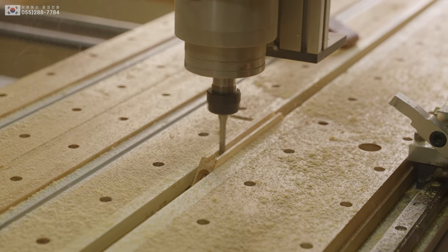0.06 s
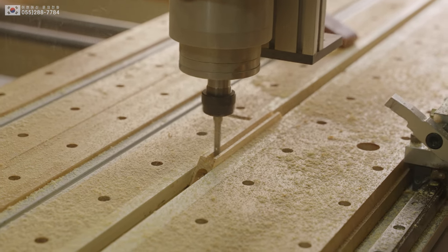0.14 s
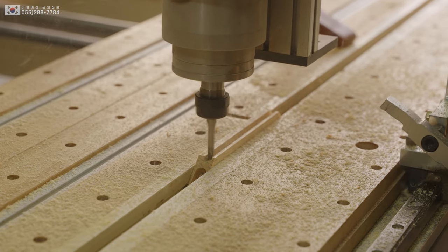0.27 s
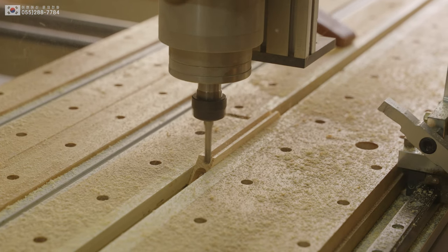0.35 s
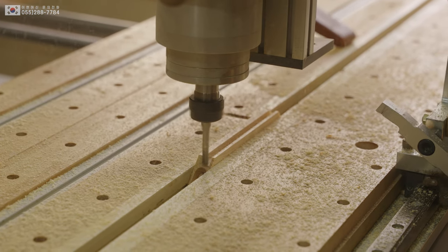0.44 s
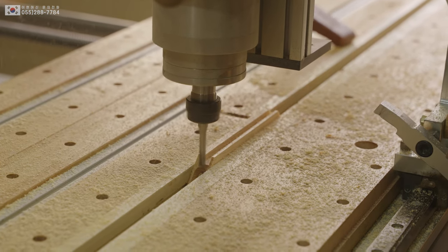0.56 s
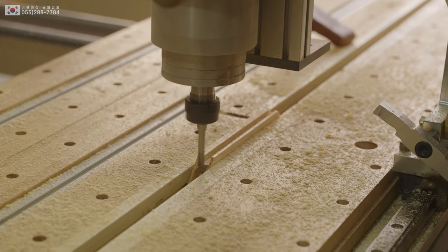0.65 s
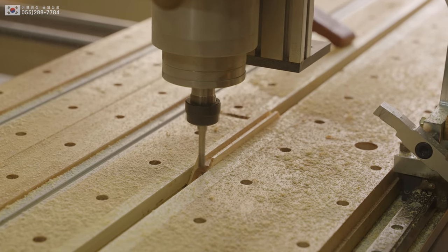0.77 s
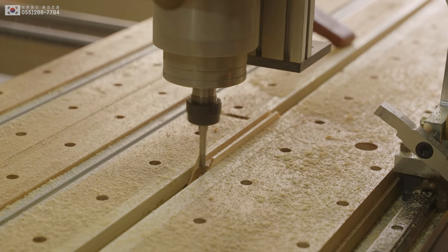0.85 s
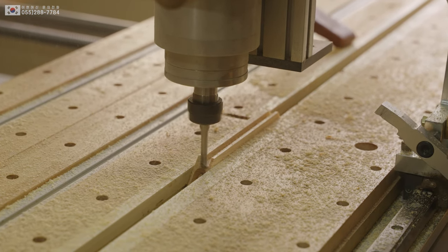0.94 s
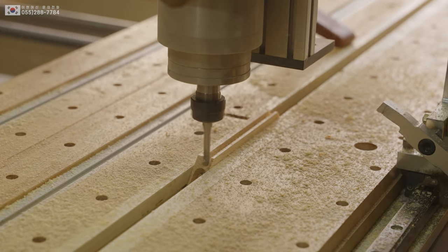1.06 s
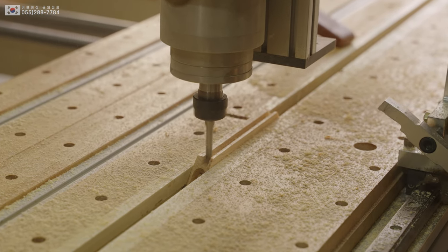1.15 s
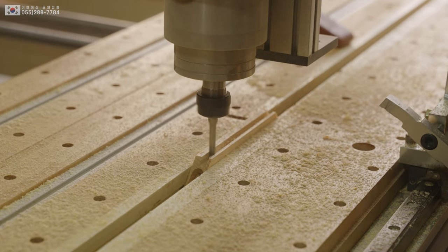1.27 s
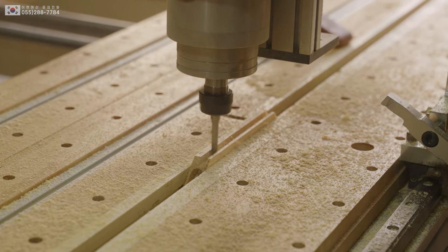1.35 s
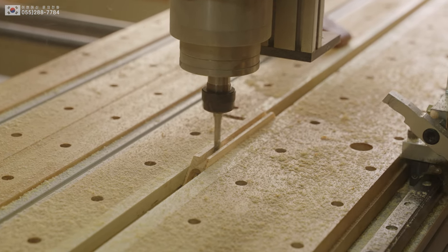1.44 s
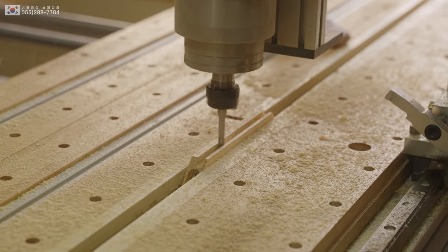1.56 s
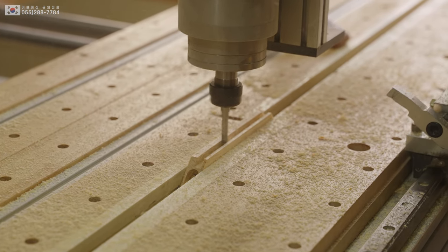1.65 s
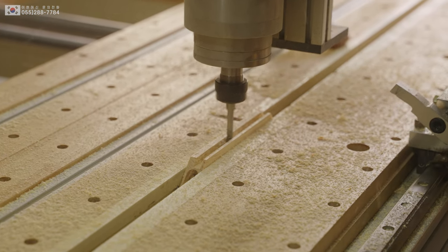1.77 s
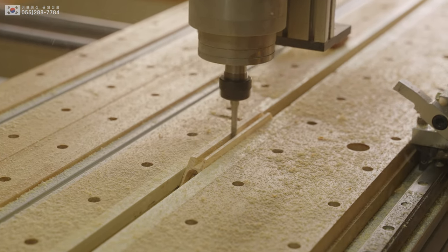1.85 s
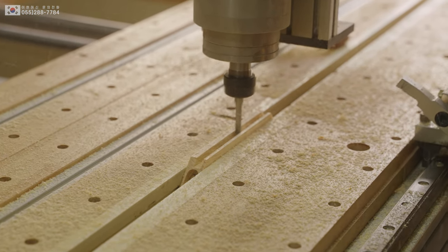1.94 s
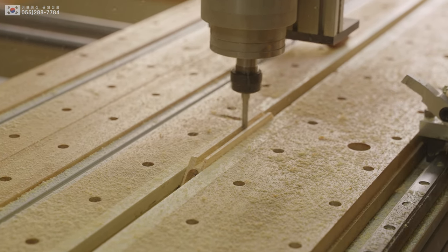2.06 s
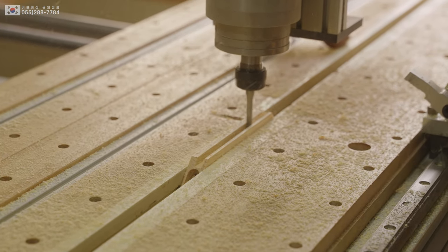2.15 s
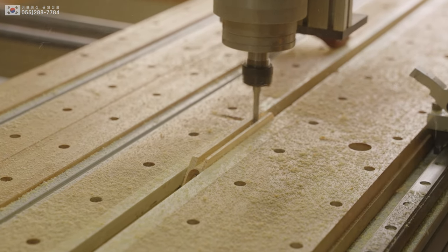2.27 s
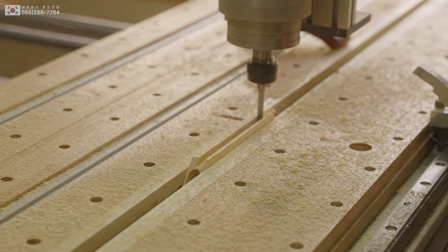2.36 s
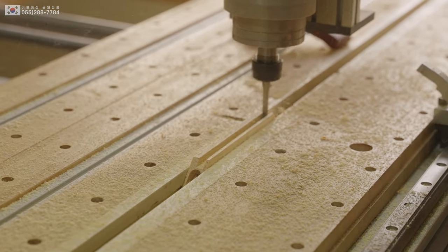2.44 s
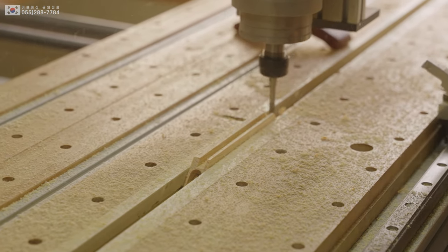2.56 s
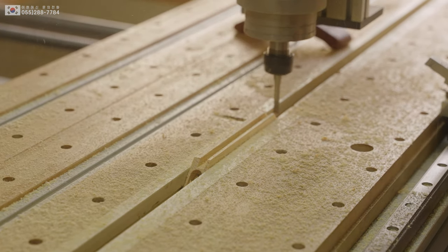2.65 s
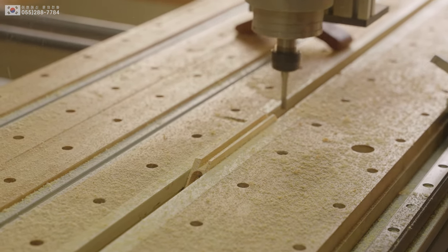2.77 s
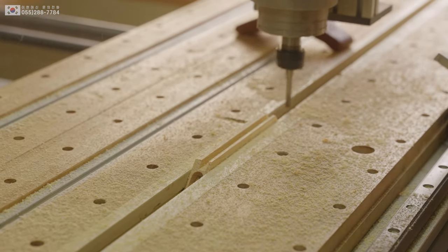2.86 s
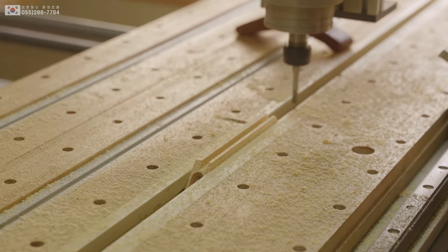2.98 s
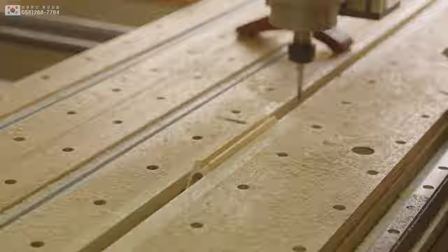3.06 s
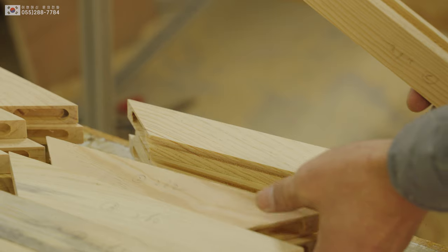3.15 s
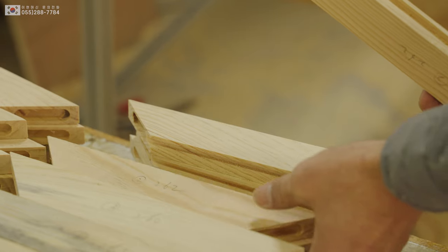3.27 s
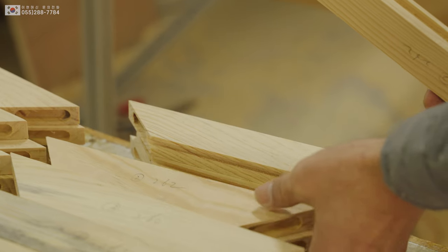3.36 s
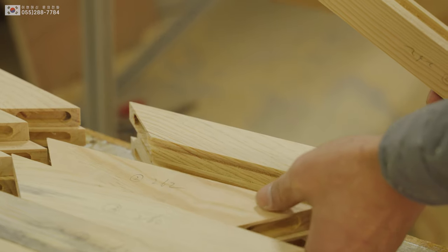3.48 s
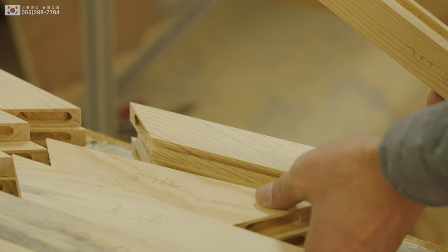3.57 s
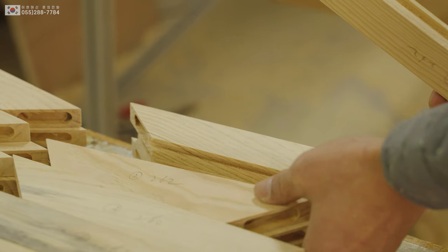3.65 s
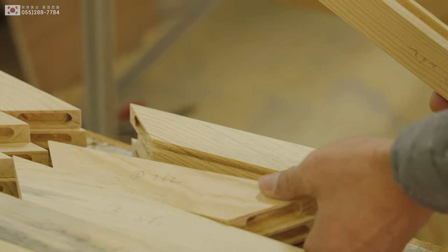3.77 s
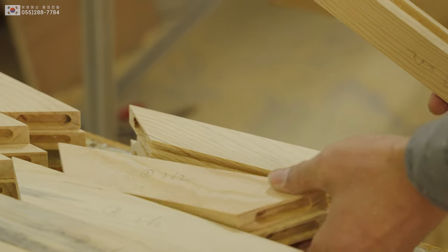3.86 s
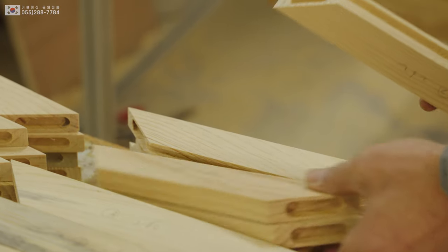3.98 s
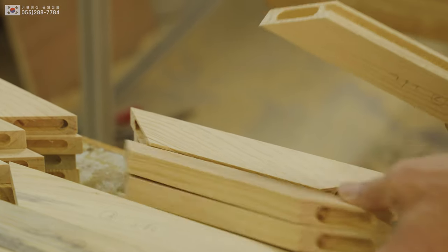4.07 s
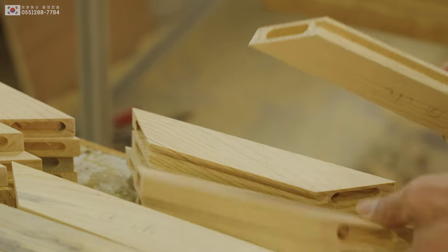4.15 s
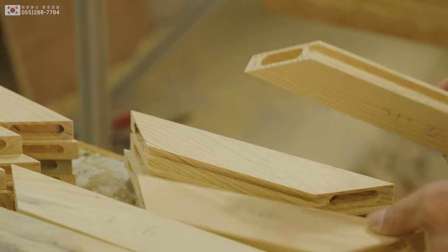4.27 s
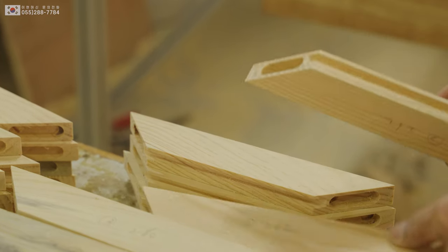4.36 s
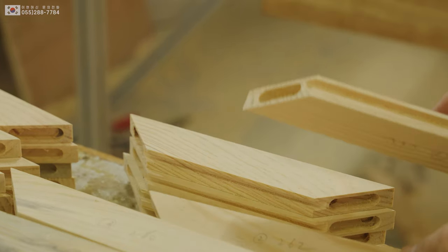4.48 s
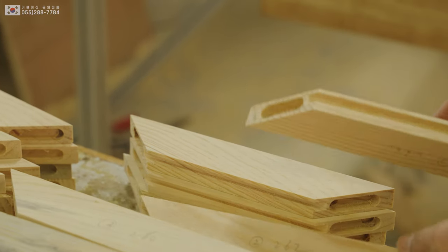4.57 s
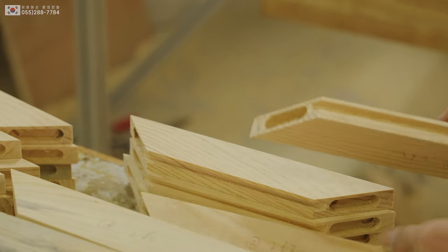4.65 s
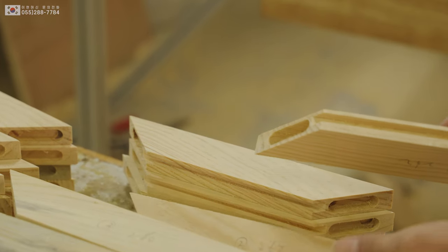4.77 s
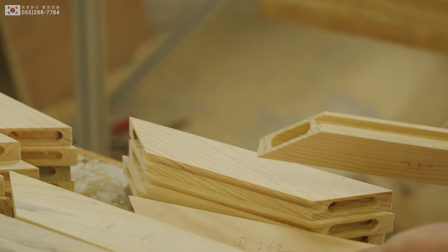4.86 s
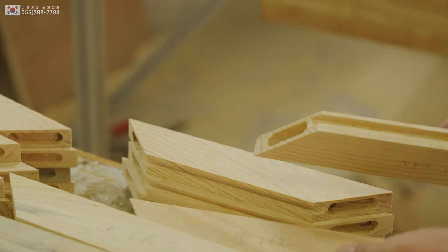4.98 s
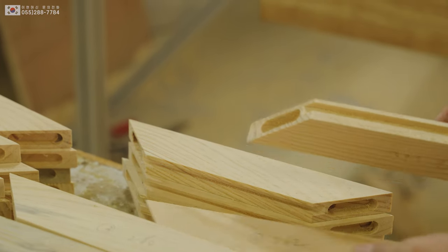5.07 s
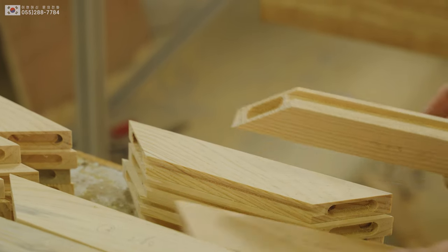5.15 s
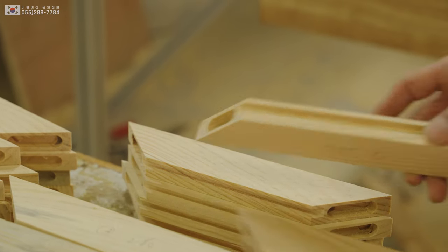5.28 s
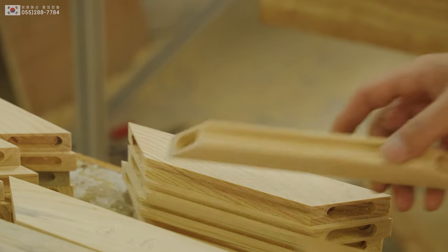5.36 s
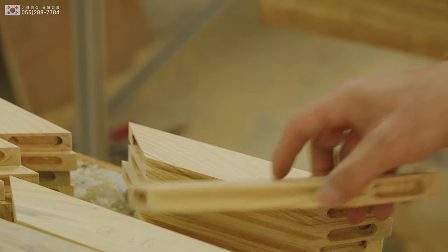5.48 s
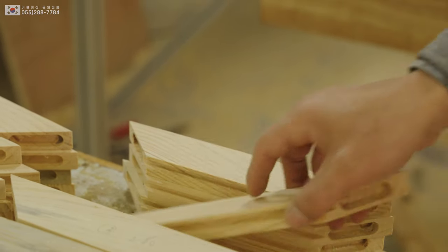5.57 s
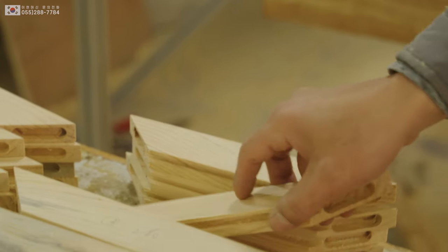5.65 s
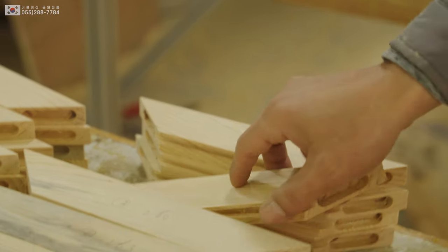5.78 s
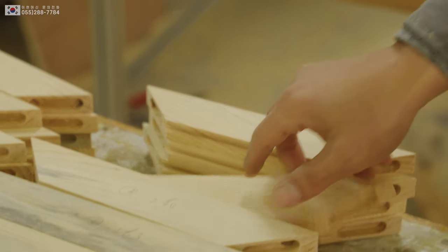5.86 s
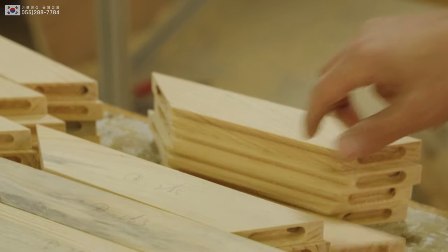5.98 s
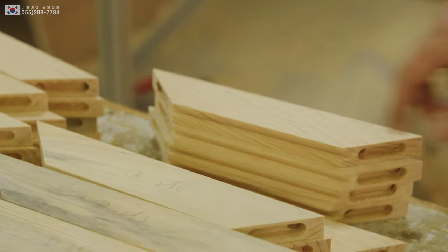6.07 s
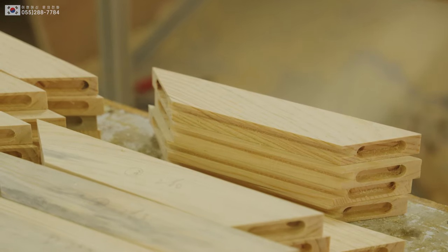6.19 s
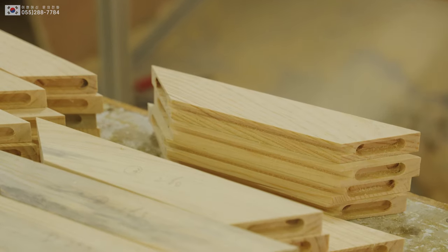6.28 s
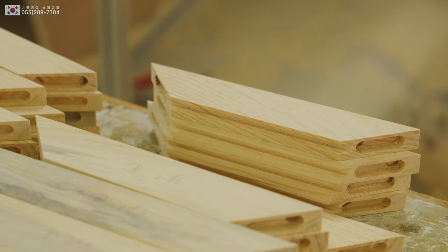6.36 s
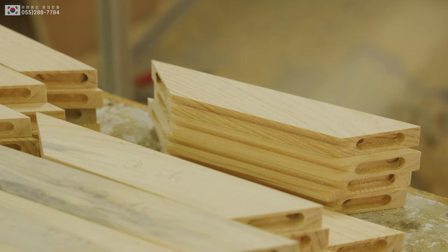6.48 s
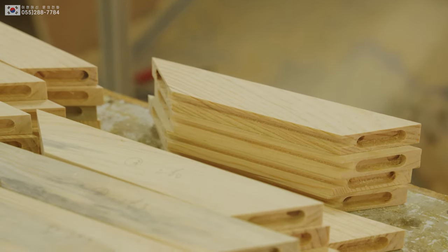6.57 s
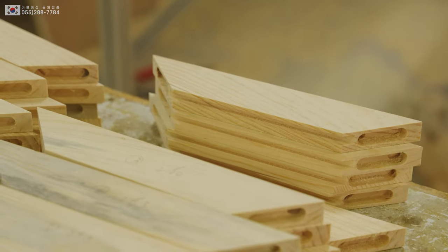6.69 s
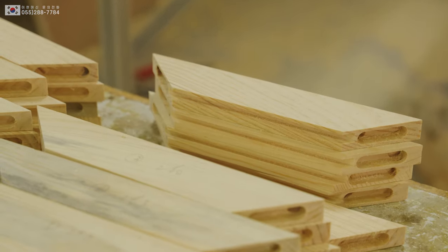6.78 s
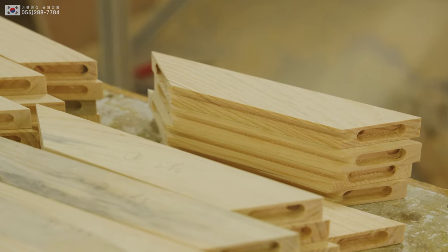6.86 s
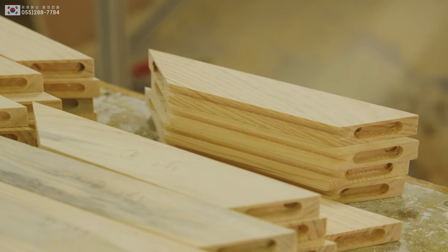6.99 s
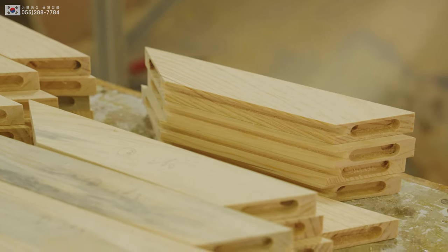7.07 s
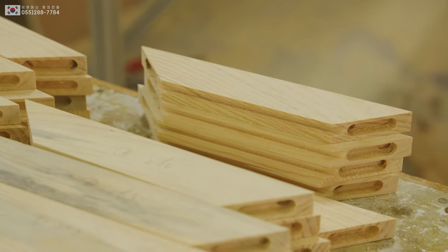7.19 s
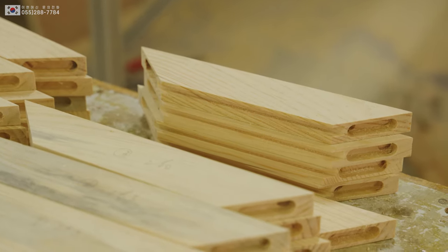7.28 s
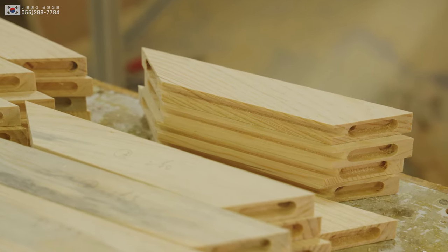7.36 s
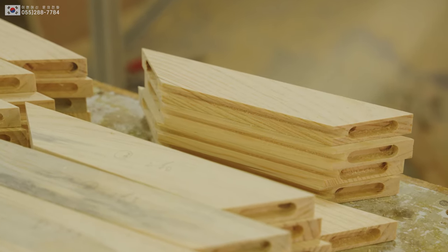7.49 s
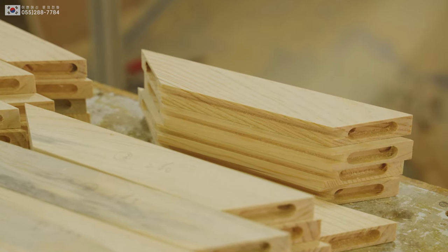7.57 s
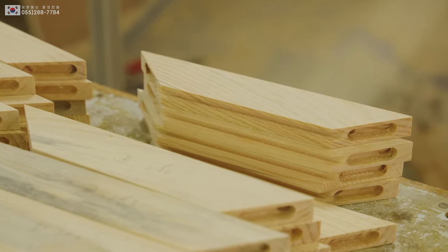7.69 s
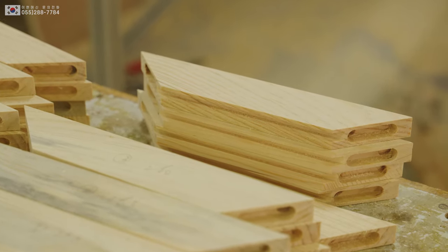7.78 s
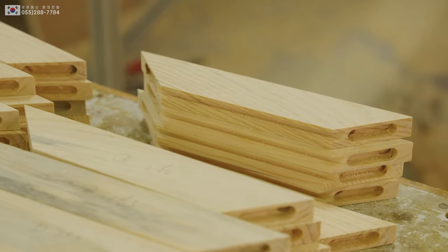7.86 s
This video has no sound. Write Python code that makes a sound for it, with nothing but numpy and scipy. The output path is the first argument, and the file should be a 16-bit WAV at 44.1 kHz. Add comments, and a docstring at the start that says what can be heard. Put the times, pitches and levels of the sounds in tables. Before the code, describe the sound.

In a furniture workshop full of rushing extraction air and humming machines, a nearby router bites into wood briefly, eases off, then cuts for longer with a ringing whine and spraying chips. The sound then shifts to a workbench, where another machine whirs and sings under a high motor whistle. Close in front, wooden rails are set down with a few dull thuds and a quick cluster of sharper knocks, while the machinery keeps running.

```python
"""A close CNC router whines and sprays chips as it cuts a groove in two passes, then runs free.
Its bit strikes the wood every turn and sets the tool ringing. At 3.17 s the scene moves to a bench
in the same furniture workshop, where wooden rails knock as they are stacked. Behind both scenes
dust extraction rushes, shafts hum, a fast motor whistles and a second spindle sings under load."""
import sys
import numpy as np
from scipy import signal
from scipy.fft import rfft, irfft, next_fast_len
from scipy.io import wavfile
from scipy.ndimage import uniform_filter1d, map_coordinates

SR = 44100
rng = np.random.default_rng(int(sys.argv[2]) if len(sys.argv) > 2 else 0)


def master_out(mix):
    """Clip the mix to full scale and print it as 16-bit PCM to the path in sys.argv[1]."""
    frames = np.transpose(np.atleast_2d(mix))
    ceiling = np.clip(frames, -1, 1)
    pcm = np.round(ceiling * 32767).astype(np.int16)
    wavfile.write(sys.argv[1], SR, pcm)


N = 349713
T = np.arange(N) / SR
AT_ROUTER = T < 3.17  # true beside the router, false at the bench
ROUTER_HZ, SPINDLE_HZ = 251.05, 893.1  # the router's shaft rate, the second spindle's blade rate
# low swells as the router reverses and as rails slide: (centre [s], length [s], boost [dB])
RUMBLE_SWELLS = [(.86, 0.57, 13.5), (3.48, 0.2, 6), (3.74, 0.35, 16)]


def amp(db):
    """Decibels to gain."""
    return np.exp(np.asarray(db) * (np.log(10) / 20))


def unit(x):
    """Scaled to rms 1."""
    return x / np.sqrt(np.mean(x ** 2) + 1e-20)


def along(points, hz):
    """(Hz, value) points read on a log axis."""
    freqs, values = np.transpose(points)
    return np.interp(np.log(hz + 1), np.log(freqs + 1), values)


def curves(rows):
    """One automation curve for each column after the time."""
    times, *columns = np.transpose(rows)
    return [np.interp(T, times, column) for column in columns]


def swells(rows, x=T):
    """A sum of smooth humps, given as (centre, length, height)."""
    return sum(height * np.cos(np.pi * np.clip((x - centre) / length, -.5, .5)) ** 2
               for centre, length, height in rows)


def gate(start, end, attack, release):
    """Rises from start, holds at 1, falls from end."""
    return np.clip(np.minimum((T - start) / attack, 1 - (T - end) / release), 0, 1)


def wobble(rate, size=N):
    """A smooth random curve with rate knots a second."""
    step = 64
    knots = rng.standard_normal(int(T[-1] * rate) + 4)
    coarse = map_coordinates(knots, [np.arange(size // step + 2) * step * rate / SR]).astype(np.float32)
    ramp = np.arange(step, dtype=np.float32) / step
    return (coarse[:-1, None] + np.diff(coarse)[:, None] * ramp).ravel()[:size]


def filtered(x, response):
    """x shaped by a complex frequency response."""
    size = next_fast_len(N + SR // 4)
    return irfft(rfft(x, size) * response(np.fft.rfftfreq(size, 1 / SR)), size)[..., :N]


def phase(hz, drift):
    """Running angle of a shaft or tone whose rate wanders by the fraction drift."""
    return 2 * np.pi * np.cumsum(hz * (1 + drift * wobble(12).astype(float))) / SR


def tone(angle, lead, scatter, rate):
    """A stereo tone, left ear ahead by lead radians; shifting reflections scatter it at each ear."""
    size = len(angle)
    angle = (angle % (2 * np.pi)).astype(np.float32)
    sin, cos = np.sin(angle), np.cos(angle)
    ears = [(float(np.cos(offset)) + scatter * wobble(rate, size)) * sin
            + (float(np.sin(offset)) + scatter * wobble(rate, size)) * cos
            for offset in (lead / 2, -lead / 2)]
    return np.array(ears) * float(np.sqrt(2 / (1 + 2 * scatter ** 2)))  # rms near 1


def rush(spectrum, patchy_db, lead_ms):
    """Stereo noise of rms 1 with patches of random gain, left ear ahead by lead_ms."""
    # narrow bass, wide treble: (frequency [Hz], left-right correlation [0-1])
    likeness = [(130, .99), (640, 0.85), (1400, 0.96), (3000, 0.39), (6000, 0.55), (10000, 0.061),
                (15000, 0.064)]
    white = signal.stft(rng.standard_normal((2, N)), nperseg=512)[2]
    patches = uniform_filter1d(rng.standard_normal(white.shape[1:]), size=5, axis=0)
    patches = uniform_filter1d(patches, size=16, axis=1)
    pair = signal.istft(white * amp(patchy_db * unit(patches)), nperseg=512)[1][:, :N]
    width = lambda hz: np.arccos(np.clip(along(likeness, hz), -1, 1)) / 2
    colour = lambda hz: amp(along(spectrum, hz)) * [np.cos(width(hz)), np.sin(width(hz))]
    mid, side = filtered(pair, colour)
    lag = lambda hz: np.exp(1j * np.pi * hz * lead_ms / 1000 * np.array([[1], [-1]]))
    return unit(filtered(np.array([mid + side, mid - side]), lag))


def load():
    """How hard the second spindle works at every sample."""
    # (time [s], load [0-1])
    effort = [(0, 0.98), (1.0, 0.98), (1.2, 0.48), (3.14, 0.18), (3.24, 0.77), (4.3, 0.81), (5.5, 1),
              (6.35, 0.6), (6.6, 0.2), (7.93, 0.08)]
    return curves(effort)[0]


def cutting():
    """The bit's bite into the wood (0-1), the time into the current pass, and that pass's settings."""
    # cuts along the groove: (start [s], end [s], whine [dB], whine tilt [dB/octave], chip spray [dB])
    passes = [(-0.1, 0.43, -22, -2, -25.5), (0.994, 2.593, -22.5, 2, -25.5)]
    enter_s, leave_s, graze = 0.065, 0.069, 0.5  # graze: the bite left between passes
    starts, ends, *settings = np.transpose(passes)
    deep = sum(gate(start, end, enter_s, leave_s) for start, end in zip(starts, ends))
    bite = np.maximum(deep, graze * gate(starts[0], ends[-1], enter_s, leave_s))
    current = np.maximum(np.searchsorted(starts, T) - 1, 0)
    return bite, T - starts[current], *(setting[current] for setting in settings)


def rumble():
    """Dull vibration of the table under moving parts."""
    # (frequency [Hz], relative density [dB])
    spectrum = [(20, -14), (60, -6), (150, -7), (300, -4), (600, -15), (2000, -70)]
    return amp(-73 + swells(RUMBLE_SWELLS)) * rush(spectrum, patchy_db=2, lead_ms=0)


def extraction():
    """Air rushes into the dust hoods; at the bench it rises slightly with the spindle's load."""
    # the air's colour in each place: (frequency [Hz], relative density [dB])
    router_spectrum = [(18, -87), (30, -66), (264, -33), (293, -27), (457, -19), (495, -16), (549, -20.5),
                       (695, -6.5), (977, -9.5), (1110, -5), (1930, -3.5), (2090, -3.5), (7950, -9.5),
                       (8820, -13), (15700, -9)]
    bench_spectrum = [(30, -30), (60, -30), (170, -27.5), (300, -20), (450, -11), (600, -6), (750, 1.5),
                      (1200, 4.5), (2500, 2.5), (3900, 1.5), (4800, -3.5), (8000, -6.5), (11800, -8.5),
                      (13000, -12), (15700, -11)]
    router_air = amp(-23.5) * rush(router_spectrum, patchy_db=0.65, lead_ms=0.061)
    air = rush(bench_spectrum, patchy_db=0.18, lead_ms=0.096)
    body = filtered(air, lambda hz: 1 / (1 + (hz / 3000) ** 2))
    hiss = air - body
    bench_air = amp(-30 + load()) * body + amp(-22.5 + 0.5 * load()) * hiss
    return np.where(AT_ROUTER, router_air, bench_air)


def hum():
    """The shafts hum at twice the router's rate and at a third of the spindle's blade rate."""
    level_db = -52 + 5.5 * load() + 0.4 * swells(RUMBLE_SWELLS) * AT_ROUTER
    router_hum = amp(level_db) * tone(phase(2 * ROUTER_HZ, drift=0.00081), 0, scatter=0.1, rate=9)
    spindle_hum = amp(-70.5) * tone(phase(SPINDLE_HZ / 3, drift=0.0005), 0, scatter=0.15, rate=3.2)
    return router_hum * amp([[1.5], [-1.5]]) + spindle_hum


def squeaks():
    """A thin squeak swells and fades somewhere in the shop."""
    # (centre [s], length [s], peak level [dB])
    soundings = [(5.55, 0.27, -37), (7.551, 0.056, -33)]
    envelope = swells([(centre, length, amp(db)) for centre, length, db in soundings])
    return envelope * tone(phase(hz=3266, drift=.002), 0, scatter=.5, rate=30)


def drive():
    """The router's drive gives off a thin pair of high tones, stronger while the bit cuts."""
    bite = cutting()[0]
    level = amp(np.where(AT_ROUTER, -47 + 2.5 * np.sqrt(bite), -53.5))
    return level * sum(amp(db) * tone(phase(hz, drift=.0001), 0, scatter=0.17, rate=6.7)
                       for hz, db in [(11046, 3.5), (11154, 2.5)])


def motor():
    """A fast motor sags under load; its wavering whistle lies three octaves above its fan tone."""
    # the whistle heard from the router: (time [s], pitch [Hz], base level [dB])
    far_whistle = [(0, 9140, -37), (.6, 9105, -34.5), (1, 8990, -32), (1.5, 8820, -41.5), (2, 8310, -32.5),
                   (2.5, 7985, -37), (3.17, 7740, -42)]
    # the whistle at the bench: (time [s], pitch [Hz])
    bench_pitch = [(3.17, 8720), (3.76, 8862), (4.8, 8812), (5.15, 8768), (5.8, 8707), (6, 8728),
                   (6.3, 8818), (6.67, 8898), (7.93, 8918)]
    # it swells or fades there: (centre [s], length [s], gain [dB])
    bench_swells = [(3.48, .25, -5), (5.68, 0.51, 5), (6.78, .22, 8.5), (7.25, 0.22, -16)]
    # resonances the fan tone slides through: (centre [Hz], width [Hz], boost [dB])
    resonances = [(1041, 22, 13.5), (1125.4, 33, 6)]
    far_hz, far_db = curves(far_whistle)
    hz = np.where(AT_ROUTER, far_hz, curves(bench_pitch)[0])
    angle = phase(hz, drift=0.0003)
    whistle_db = np.where(AT_ROUTER, far_db - 0.5, -33 + swells(bench_swells) + 0.92 * wobble(11))
    whistle = amp(whistle_db) * tone(angle, -1.2, scatter=0.58, rate=22)
    fifth_db = np.where(AT_ROUTER, far_db - 13, -46) + 2.5 * wobble(7)
    fifth = amp(fifth_db) * tone(angle * 3 / 2, 1.23, scatter=.6, rate=22)
    suboctave_db = np.where(AT_ROUTER, far_db + 1, -41) + 1.2 * wobble(5.5)
    suboctave = amp(suboctave_db) * tone(angle / 2, 2.4, scatter=0.22, rate=14)
    fan_db = np.where(AT_ROUTER, -40.5, -45) + swells(resonances, hz / 8)
    fan = tone(angle / 8, .1, scatter=0.41, rate=15)
    fan = fan + amp(-3) * tone(angle / 4, .4, scatter=0.21, rate=13)
    unbalance = amp(-61.5 + 9.2 * load()) * ~AT_ROUTER * tone(angle / 16, 0, scatter=0.46, rate=4.02)
    return whistle + fifth + suboctave + amp(fan_db) * fan + unbalance


def spindle():
    """A second cutter sings at its blade rate, louder under load and brighter beside the router."""
    # the blade tone: (harmonic, idle level [dB], full-load boost [dB], gain beside the router [dB])
    low_partials = [(1, -50.5, 15, -1), (2, -46.5, 12, 5), (3, -48.5, 12.5, -1)]
    # the squeal above it: (harmonic, relative level [dB])
    high_partials = [(4, 0), (5, -6), (6, -7.5), (7, -11), (8, -8), (9, -12), (11, -10), (12, -12),
                     (13, -12), (14, -13), (16, -15), (17, -16)]
    # one partial sings out or fades: (harmonic, centre [s], length [s], gain [dB])
    partial_swells = [(1, 6.25, 1.7, 5.5), (2, 4.32, 0.64, 0.5), (2, 4.98, 1.3, -7), (2, 6.5, 0.62, 6.5),
                      (2, 7.2, 1.48, 7), (3, 0.54, 0.95, 9.5), (3, 5.17, 0.71, 2.5), (4, 5.46, .7, 5.5),
                      (5, 4.62, 0.54, 11), (5, 0.96, 0.44, 8), (5, 7.8, 1.0, 9)]
    angle, effort = phase(SPINDLE_HZ, drift=0.00056), load()
    sing_db = lambda k: swells([row[1:] for row in partial_swells if round(row[0]) == k])
    blade = sum(amp(db + load_db * effort + router_db * AT_ROUTER + sing_db(k))
                * tone(k * angle, 0.49 * k, scatter=0.26, rate=14)
                for k, db, load_db, router_db in low_partials)
    squeal = sum(amp(db + 0.49 * (k - high_partials[0][0]) * AT_ROUTER + sing_db(k))
                 * tone(k * angle, rng.normal(0, 0.15 * k), scatter=0.059 * k, rate=16)
                 for k, db in high_partials)
    return blade + amp(-51.5 + 12.5 * effort) * squeal


def rails():
    """Each contact scuffs a wooden rail and rings its modes; a soft one leaves only the low thud."""
    # rails set down and nudged: (time [s], relative level [dB], hardness as cut-off [Hz])
    knocks = [(3.205, -21.5, 420), (3.679, -27, 302), (3.769, -40, 200), (4.259, -29, 320),
              (5.659, -38, 593), (5.946, -23, 1507), (5.989, -19.5, 1500), (5.993, -25.5, 3260),
              (6.079, -27, 1600), (6.088, -24.5, 3200)]
    # a rail on the stack: (frequency [Hz], relative level [dB], 60 dB decay time [s])
    modes = [(188, -18, 0.11), (318, -6, 0.067), (385, -3.5, 0.096), (710, 2, .07), (814, 6.5, 0.06),
             (975, -2, .05), (1030, 3, 0.028), (1450, 1, 0.072), (2280, -8, 0.033), (3280, 12, 0.034)]
    out, t = np.zeros(N + SR), T[:SR // 3]
    for start, db, cutoff_hz in knocks:
        ring = sum(amp(mode_db + rng.normal(0, 1) - 60 * t / t60) / (1 + (hz / cutoff_hz) ** 2)
                   * np.sin(2 * np.pi * hz * t + rng.uniform(0, 2 * np.pi))
                   for hz, mode_db, t60 in modes)
        scuff = signal.lfilter(*signal.butter(2, cutoff_hz, fs=SR), rng.standard_normal(len(t)))
        blow = ring + scuff * (3 * amp(-60 * t / .006) + 0.57 * amp(-60 * t / 0.37))
        # light, hard taps carry hardly any bass
        blow = signal.lfilter(*signal.butter(2, min(cutoff_hz / 2, 550), "high", fs=SR), blow)
        out[round(start * SR):][:len(t)] += amp(db - 6.5) * blow
    return out[:N]


def chip_spray(angle):
    """Fibres tear and chips fly in uneven bursts, pulsing three times to a turn of the bit."""
    # hissing chips and tearing fibres: (frequency [Hz], relative density [dB])
    chip_spectrum = [(2530, -46), (4300, -14), (5280, -13), (5610, -3), (6780, -4), (7230, -3), (8060, 2),
                     (9380, -1), (10300, -1), (11200, 3.5), (12600, -4), (15100, -2.5), (15700, -9)]
    tear_spectrum = [(300, -57), (700, -20), (1100, -24), (2000, -11.5), (3000, 18), (4000, 3.5),
                     (6000, -25), (12000, -40)]
    # spurts of chips: (centre [s], length [s], boost [dB])
    spurts = [(1.04, 0.13, 8.5), (1.36, .16, 1), (2.0, 0.11, 4), (2.57, 0.12, 3.5)]
    bite, *_, spray_db = cutting()
    bursts = unit((1 + 0.1 * np.cos(3 * angle)) * amp(1.2 * wobble(150) + 0.76 * wobble(27.1)))
    flow = amp(spray_db + swells(spurts) + 0.44 * wobble(7.7)) * bite ** 0.84
    chips = flow * rush(chip_spectrum, patchy_db=4, lead_ms=0)
    tear = amp(-31.5 + 1.1 * wobble(13)) * bite * rush(tear_spectrum, patchy_db=2.5, lead_ms=-0.087)
    return bursts * (chips + tear)


def bit_whine(turn):
    """The struck tool rings, with shaft harmonics and sidebands; the whine grows steeply with bite."""
    # (shaft multiple, ring multiple, relative level [dB], fade along a pass [dB/s], left lead [rad])
    partials = [(4, 0, -12, 0.5, -0.38), (6, 0, -26, 6, 0), (8, 0, -17, -4.5, -0.14), (-4, 1, -14, 8, 0),
                (0, 1, 2, 2.5, -0.86), (4, 1, -4, 6.5, -0.15), (4, 2, -19, 14, 1), (16, 1, -16, 11, -1)]
    # the bit sings out or loses its note: (centre [s], length [s], gain [dB])
    surges = [(.28, .16, 3), (1.34, 0.29, 2.5), (1.5, .2, -2.5), (1.94, 0.18, -5), (2.43, 0.099, -6),
              (2.53, 0.17, 1)]
    # the whine pans as the bit travels: (time [s], left minus right [dB])
    swing = [(0, 0), (1.3, 3), (1.65, -5), (2.2, -6.5), (2.6, 4)]
    ring_hz, size = 2770.7, len(turn)
    bite, age, whine_db, tilt_db, _ = cutting()
    ring = phase(ring_hz, drift=0.00099)[:size]
    level_db = whine_db + swells(surges)
    whine = 0
    for k, m, db, fade, lead in partials:
        octaves = np.log2(k * ROUTER_HZ / ring_hz + m)
        gain = amp(level_db + db - fade * age + tilt_db * octaves)[:size]
        whine += gain * tone(k * turn + m * ring, lead, scatter=0.27, rate=45)
    pan_db = curves(swing)[0][:size]
    return whine * amp([pan_db / 2, -pan_db / 2]) * bite[:size] ** 2.74


def router():
    """The bit strikes the wood every turn: a buzzing comb of harmonics with whine, chatter and chips."""
    # outline of the shaft's harmonics: (frequency [Hz], level of each at full bite [dB])
    outline = [(750, -80), (1250, -68), (1500, -38), (1750, -44), (2000, -34.5), (2500, -70), (3300, -44),
               (4500, -45), (6500, -43), (8400, -43), (9500, -48), (11000, -40.5), (12500, -38.5)]
    # fits of chatter on the harmonic just above the tool's ring: (centre [s], length [s], boost [dB])
    fits = [(1.59, 0.24, 13.5), (2.15, 0.52, 11), (2.54, 0.55, 17)]
    size = 3 * SR  # the cutting is over within 3 s
    bite = cutting()[0][:size]
    angle = phase(ROUTER_HZ, drift=0.00085)
    turn = angle[:size]
    whine = bit_whine(turn)
    chatter = amp(-40 + swells(fits))[:size] * tone(12 * turn, -.4, scatter=.4, rate=70)
    comb = 0
    for k in range(3, int(outline[-1][0] / ROUTER_HZ)):
        offset, lead = rng.uniform(0, 2 * np.pi), rng.normal(0, min(k / 14, 2))
        comb += amp(along(outline, k * ROUTER_HZ)) * tone(k * turn + offset, lead, scatter=1, rate=8 + k)
    tones = whine + (chatter + comb) * bite
    return np.pad(tones, ((0, 0), (0, N - size))) + chip_spray(angle)


def scene():
    """All machines together, with the rails close in front; the mix leans slightly left."""
    # the din dips briefly as the last rail lands: (time [s], depth [dB])
    dips = [(5.994, 4), (6.089, 4.5)]
    attack_s, release_s = 0.0087, 0.096
    din = router() + spindle() + motor() + drive() + hum() + squeaks() + extraction()
    dip_db = sum(db * gate(start, start + attack_s, attack_s, release_s) for start, db in dips)
    lean_db = np.where(AT_ROUTER, 1, 1.34)
    return (din * amp(-dip_db) + rails() + rumble()) * amp([lean_db / 2, -lean_db / 2])


def record(dry):
    """A 4 ms fade-in and a hard treble cut at 15750 Hz."""
    return filtered(dry * np.minimum(T / .004, 1), lambda hz: hz < 15750)


dry = scene()
out = record(dry)
master_out(out)
```